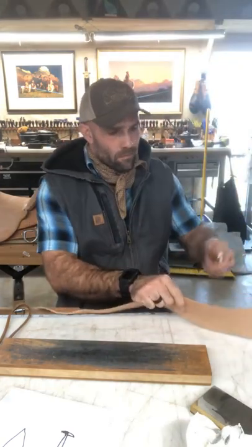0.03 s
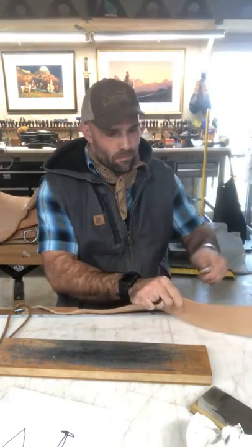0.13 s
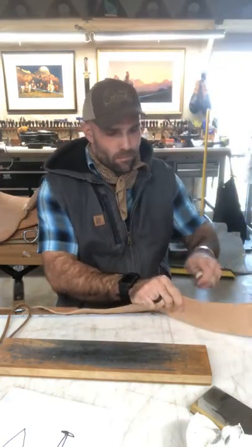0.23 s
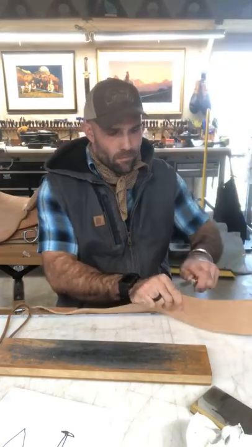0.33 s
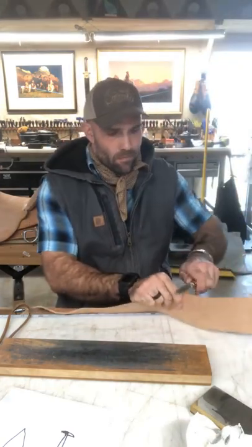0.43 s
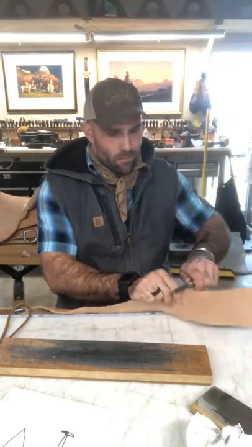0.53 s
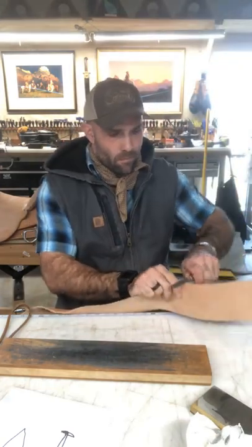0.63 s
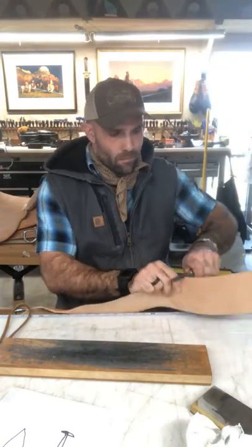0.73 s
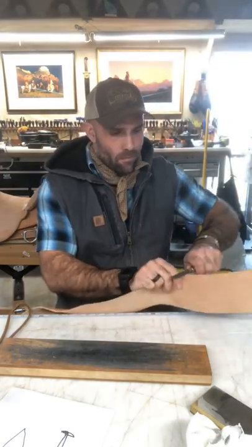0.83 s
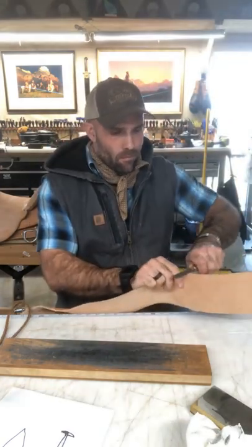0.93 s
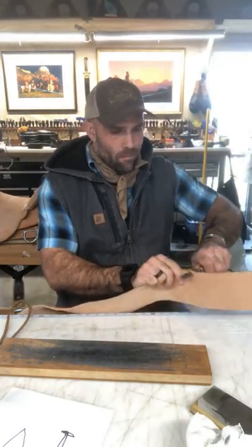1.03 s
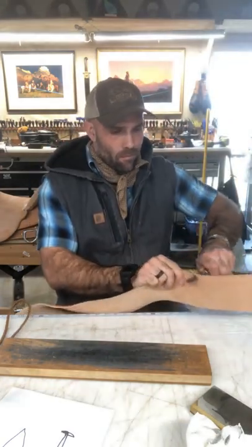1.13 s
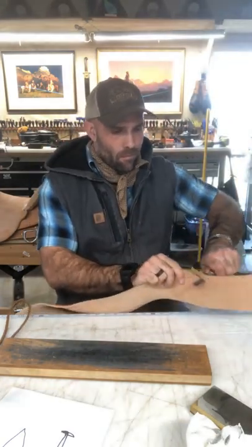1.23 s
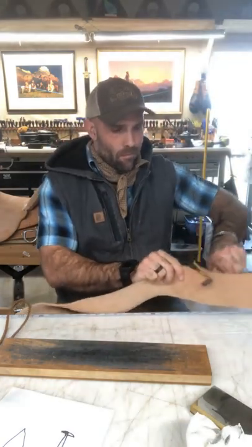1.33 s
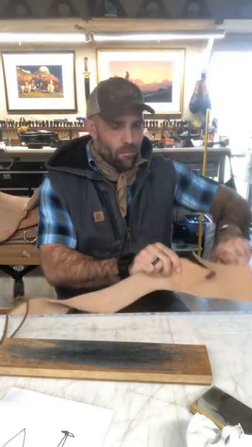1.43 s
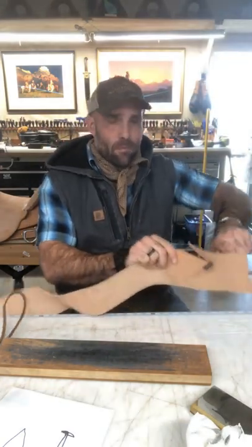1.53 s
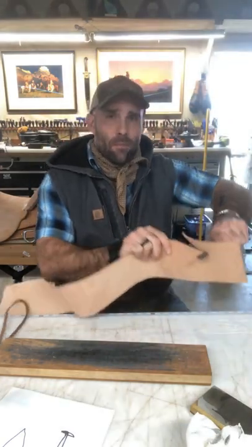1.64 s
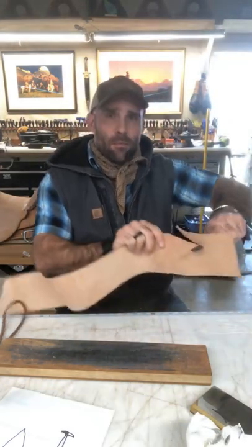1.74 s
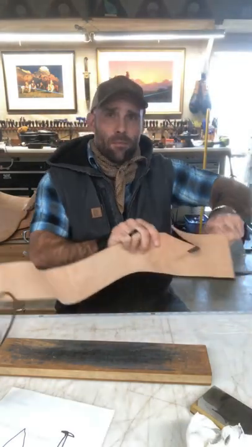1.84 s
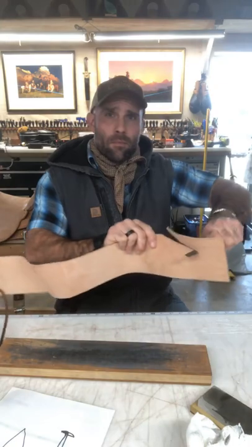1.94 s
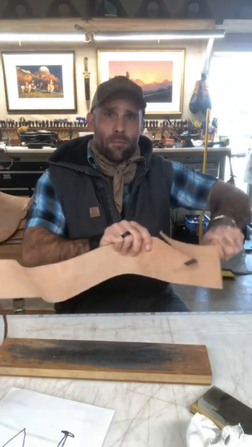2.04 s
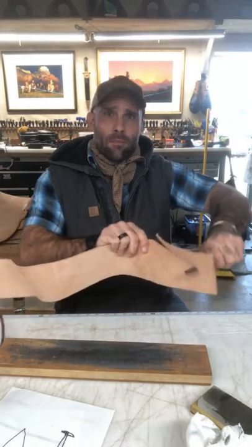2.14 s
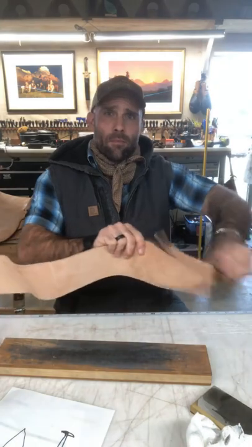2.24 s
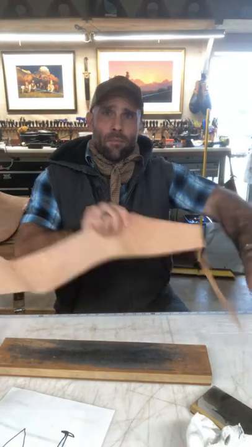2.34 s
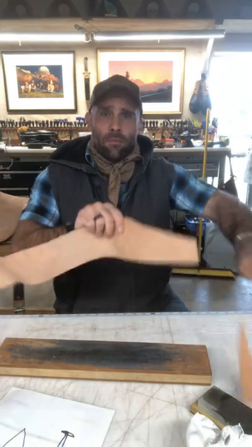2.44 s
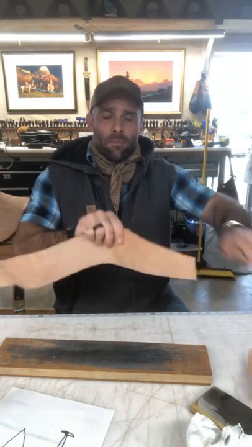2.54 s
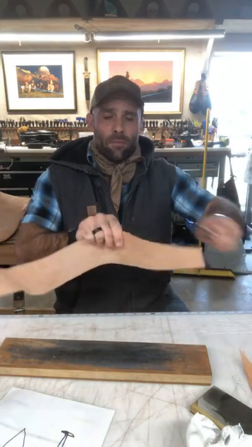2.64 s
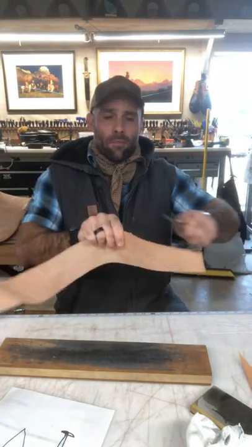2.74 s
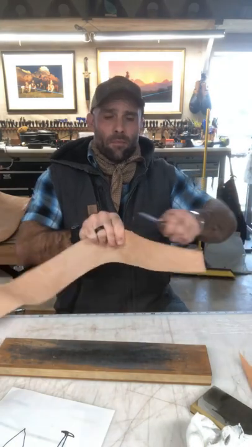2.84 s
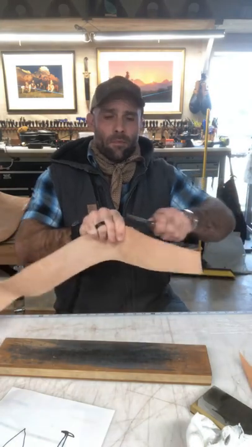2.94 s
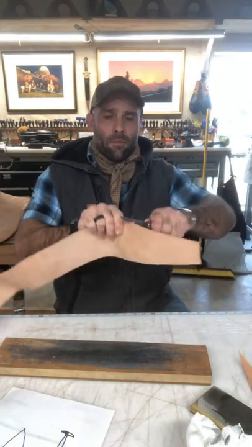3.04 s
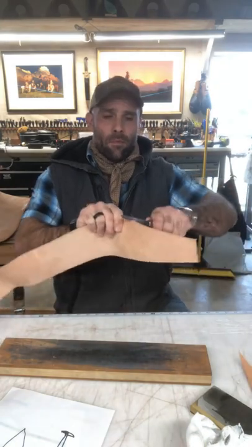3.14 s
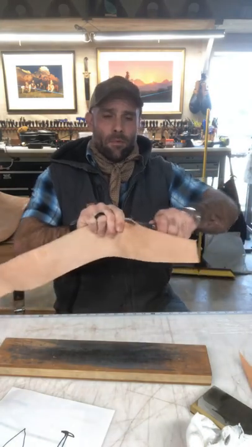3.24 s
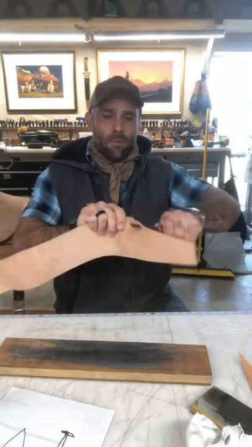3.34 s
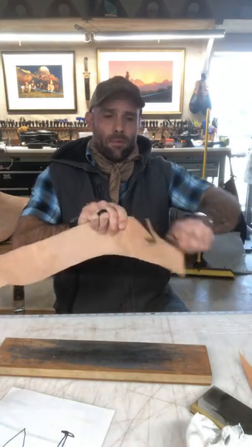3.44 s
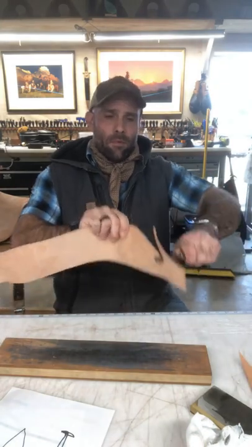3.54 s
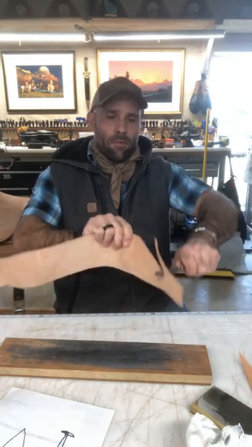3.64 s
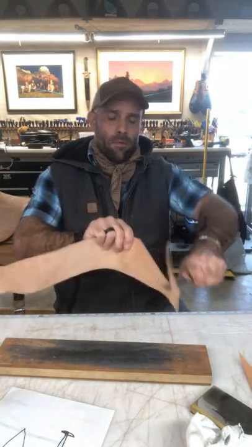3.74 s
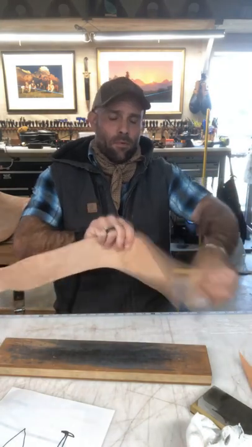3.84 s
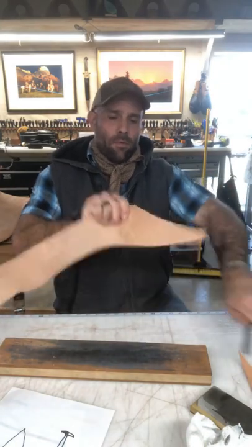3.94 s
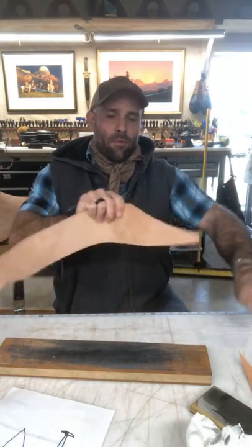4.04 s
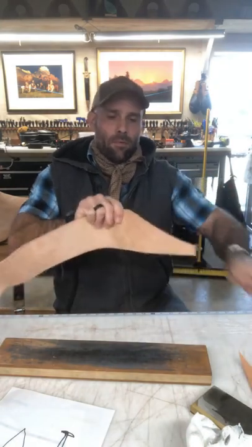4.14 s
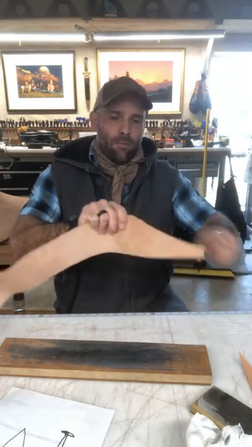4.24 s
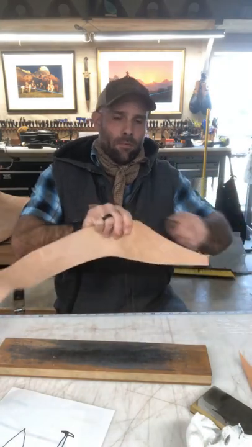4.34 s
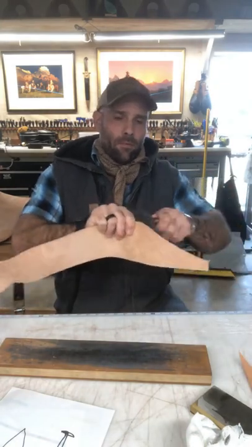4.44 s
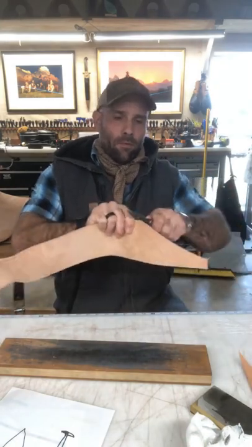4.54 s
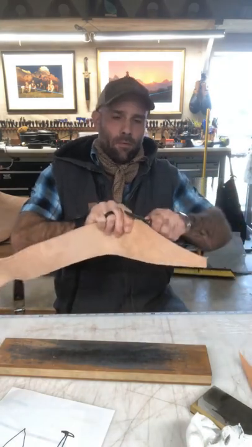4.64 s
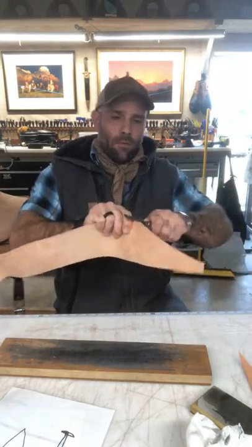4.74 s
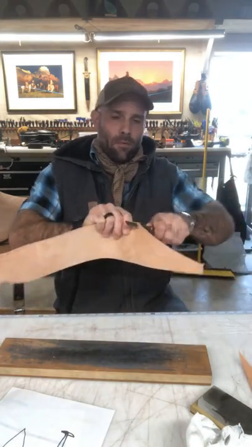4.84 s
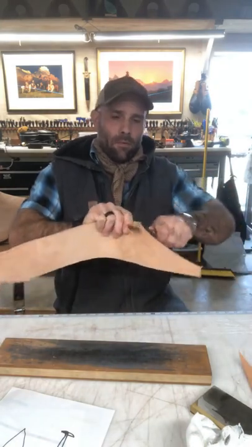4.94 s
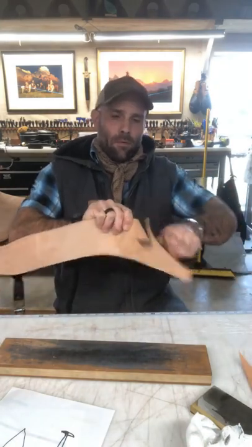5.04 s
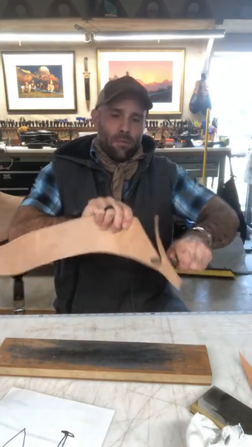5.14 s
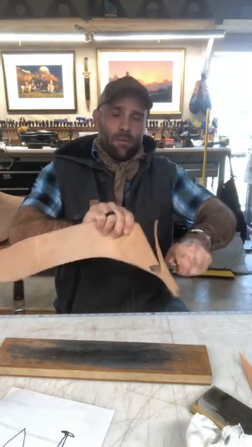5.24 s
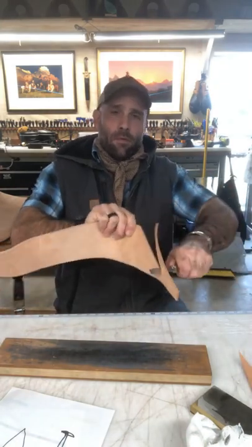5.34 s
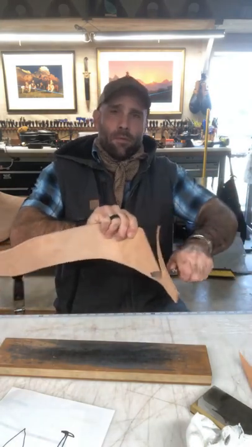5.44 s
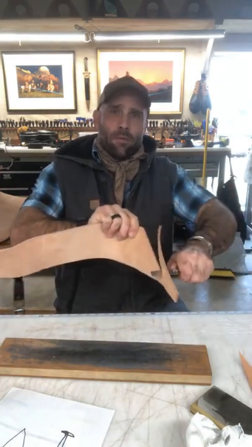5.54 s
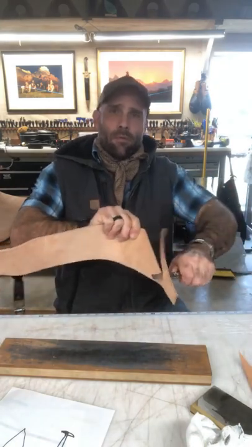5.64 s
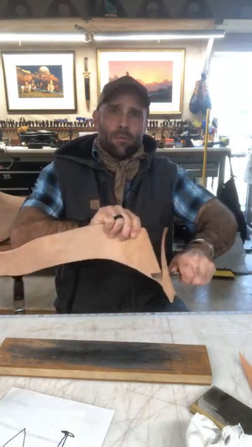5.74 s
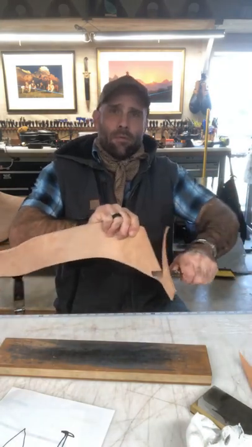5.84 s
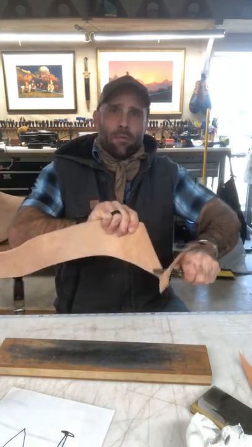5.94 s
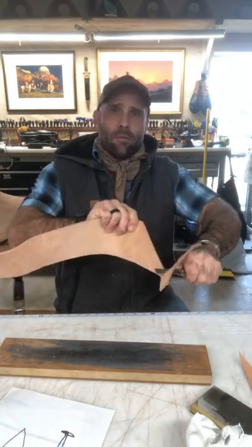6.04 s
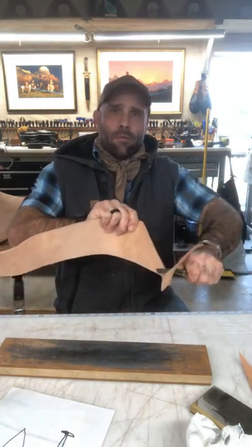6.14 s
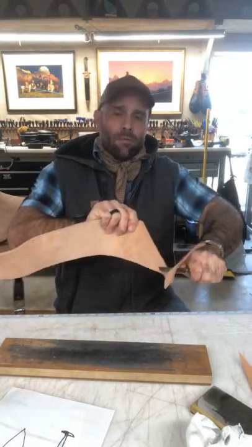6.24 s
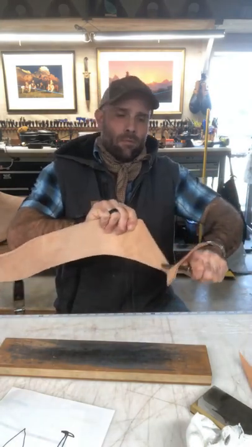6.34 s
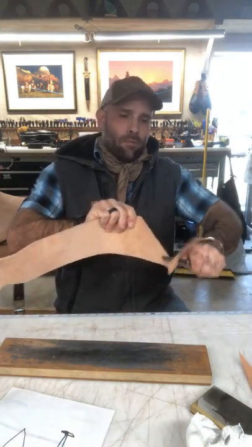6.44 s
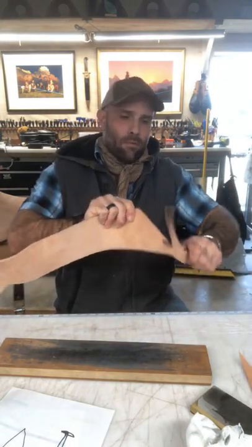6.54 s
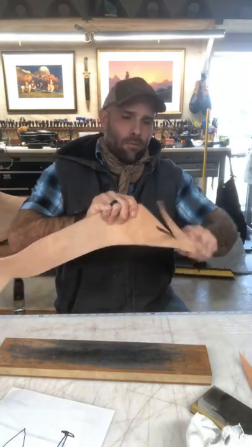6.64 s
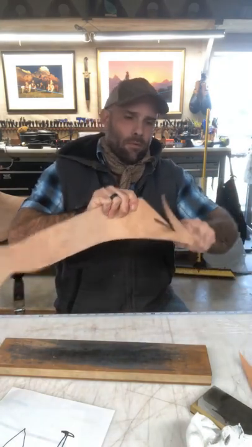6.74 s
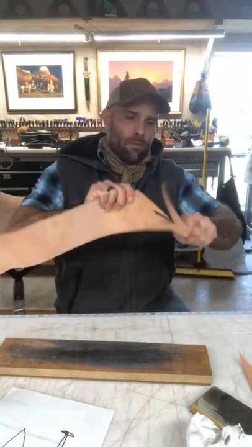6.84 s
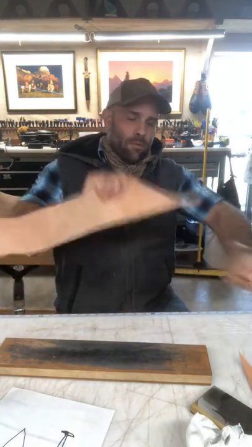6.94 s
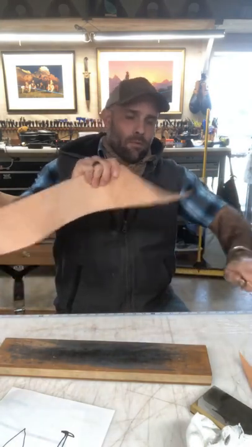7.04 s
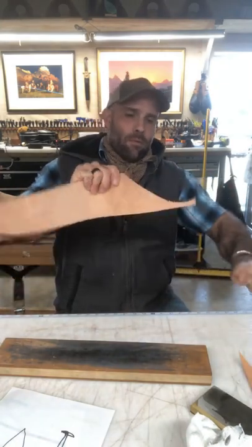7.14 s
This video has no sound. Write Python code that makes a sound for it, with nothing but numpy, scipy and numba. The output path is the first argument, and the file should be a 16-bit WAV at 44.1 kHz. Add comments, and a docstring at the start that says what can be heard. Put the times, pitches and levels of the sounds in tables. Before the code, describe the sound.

Over the low hum of ventilation in a small workshop, a sheet of leather flexes softly and a nearby knife draws a long, hissing cut through it. A sharp click and dull flaps lead into several shorter, rasping slices. Then the blade catches, tearing forward in crackling jerks with a faint steel ring. One quick pull snaps the last fibres, and the sheet flaps once more.

```python
"""A knife trims strips off stiff leather above a workshop bench, over a low ventilation hum.
One long stroke parts the fibres in a dense rasp; then the knife clicks and the loose sheet flaps.
Quicker slices follow from 3 s, with more flaps between them. Past 5 s the blade sticks in a tough
spot and jerks forward in sharp cracks. Near 7 s a short pull rips the last fibres, the strip whips
free, and a last dull flap thuds in the small room."""
import sys
import numpy as np
from scipy import signal
from scipy.fft import rfft, irfft
from scipy.io import wavfile
from scipy.ndimage import uniform_filter1d, map_coordinates
from numba import njit

SR = 44100
rng = np.random.default_rng(int(sys.argv[2]) if len(sys.argv) > 2 else 0)


def to_wav(sig):
    """Store sig (one row per channel, or 1-D mono) as 16-bit WAV at the path in sys.argv[1].

    Samples outside -1..1 are clipped; the rate is SR.
    """
    pcm = np.clip(np.atleast_2d(sig), -1, 1) * 32767
    pcm = np.round(pcm).astype(np.int16)
    wavfile.write(sys.argv[1], SR, pcm.T)  # frames by channels


N = 317501

# bright hiss of parting fibres: (frequency [Hz], level [dB])
FIBRE_SPECTRUM = [(900, -38), (2200, -8), (3000, 0), (3500, 2), (5400, 0.5), (7200, -1.5), (9200, -3.5),
                  (10500, -4.5)]
# full-bodied crack of tearing leather: (frequency [Hz], level [dB])
TEAR_SPECTRUM = [(90, -9.5), (200, -1), (310, 10), (460, -5), (580, 3.5), (790, -4.5), (1100, 0), (1500, 2),
                 (1800, -13), (2400, -3), (3200, -8.5), (5000, -13), (9300, -15), (11000, -11)]


def strokes():
    """Snapping fibres shake the sheet, hiss, and excite a ring that glides as the cut nears the edge."""
    # how hard the blade cuts, one curve a stroke: (time [s], effort [dB])
    long_slice = [(0.995, -45.5), (1.005, -47.5), (1.017, -40), (1.203, -52), (1.215, -45.5),
                  (1.397, -43.5), (1.745, -59.5), (1.781, -49.5), (1.931, -54.5), (2.167, -44),
                  (2.199, -45.5), (2.323, -30.5), (2.335, -42)]
    quick_slices = [
        [(3.15, -56.5), (3.176, -47.5), (3.224, -69), (3.23, -41), (3.274, -37.5), (3.328, -41), (3.43, -31.5),
         (3.528, -35), (3.55, -52)],
        [(3.705, -39), (3.721, -40), (3.745, -31), (3.883, -32), (3.89, -42)],
        [(4.8, -40), (4.808, -37), (4.902, -50), (4.99, -38.5), (5.054, -38), (5.066, -36), (5.168, -29),
         (5.2, -36.5), (5.21, -52)],
    ]
    short_pulls = [
        [(3.595, -37.5), (3.605, -36.5), (3.619, -42), (3.63, -47)],
        [(6.85, -54), (6.892, -44), (6.93, -23), (6.936, -21.5)],
    ]
    # the ring of each stroke above: (time at the edge [s], run-out [s], pitch [Hz],
    # pitch at the edge [Hz], ring-to-sheet balance [dB], balance at the edge [dB])
    stroke_rings = [(2.235, .012, 1540, 1830, -0.5, 1.5), (3.475, 0.03, 1730, 2480, 11.5, -2.5),
                    (3.8, 0.017, 1630, 1610, -3, 3.5), (5.121, 0.0091, 1680, 2370, 11, 5),
                    (3.61, .01, 1800, 1890, 3, -12), (6.91, .015, 1400, 1270, 2.5, 6.5)]
    # body of the shaken sheet: (frequency [Hz], level [dB])
    sheet_spectrum = [(100, -13), (190, -1), (290, 5), (450, 1), (600, 5.5), (790, -2.5), (1000, 2),
                      (1200, -9.5), (1600, -19.5), (2600, -24), (5000, -70)]
    out = np.zeros(N)
    for curve, stroke_ring in zip([long_slice, *quick_slices, *short_pulls], stroke_rings):
        edge_s, run_out_s, hz, edge_hz, over_db, edge_db = stroke_ring
        times, efforts = np.transpose(curve)
        t = np.arange(times[0] - .01, times[-1] + .02, 1 / SR)
        effort_db = np.interp(t, times, efforts)
        at_edge = (1 + np.tanh((t - edge_s) / (2 * run_out_s))) / 2
        pitch = hz + (edge_hz - hz) * at_edge
        # the effort is shared between the whole sheet and the ring at the cut
        balance_db = over_db + (edge_db - over_db) * at_edge
        sheet_db = effort_db - 10 * np.log10(1 + amp(balance_db) ** 2)
        # fibres lie in bundles, so the rasp comes in clumps
        fibres = snaps(len(t), rate=9000, spread_db=-2.0)
        fibres *= amp(1.37 * wobble(170, len(t)) + 1.6 * wobble(32.7, len(t)))
        sheet = amp(sheet_db - 1.6) * unit_rms(coloured(fibres, sheet_spectrum))
        # a light stroke sings narrowly; a hard one shakes the sheet and smears the ring
        force = np.clip((sheet_db + 55) / 15, 0, 1)
        broad = unit_rms(ring(ring(fibres, pitch, width_hz=1010), pitch, width_hz=1130))
        narrow = unit_rms(ring(broad, pitch, width_hz=490))
        cut = amp(sheet_db + balance_db - 2.5) * (force * broad + (1 - force) * narrow)
        # the hiss grows a little faster than the effort
        hiss_db = effort_db - 6.5 + 0.17 * (effort_db + 39.5) - 0.1 * balance_db
        hiss = amp(hiss_db) * unit_rms(patchy(coloured(fibres, FIBRE_SPECTRUM), depth_db=1.8))
        add(out, t[0], (sheet + cut + hiss) * gate(t, times[0], times[-1], ramp_s=0.0055))
    return out


def bites():
    """The tip of the blade rasps brightly as it enters the leather."""
    # entries of the tip: (time [s], level [dB], t60 [s])
    entries = [(1.007, -47.5, 1), (3.155, -49, 0.21), (3.595, -39.5, 0.17), (3.704, -41, 0.26),
               (4.805, -64, 0.084)]
    out, t = np.zeros(N), np.arange(SR // 3) / SR
    for start, db, t60 in entries:
        fibres = snaps(len(t), rate=13000, spread_db=-2.0)
        tip = unit_rms(ring(ring(fibres, 2980, width_hz=760), 2440, width_hz=990))
        rasp = tip + amp(2.0) * coloured(fibres, TEAR_SPECTRUM)
        attack = 1 - np.exp(-t / 0.0052)
        add(out, start, amp(db - 4) * rasp * fade(t, t60) * attack)
    return out


def jerks():
    """Each slip of the stuck blade tears a bundle and rings both the taut leather and the steel."""
    # slips of the blade, the last row a brief soft scrape: (time [s], crack level [dB], ring level [dB])
    slips = [(2.318, -36.5, -35), (3.878, -31.5, -59), (5.262, -46, -36), (5.42, -49, -46),
             (5.46, -34, -53), (5.484, -29.5, -36.5), (5.653, -57, -49), (5.662, -35.5, -48),
             (5.684, -30.5, -43), (5.707, -32, -32), (5.714, -26.5, -26.5), (5.722, -37, -49),
             (5.875, -37.5, -37), (5.9209, -27, -30), (5.931, -27, -31), (5.9483, -27.5, -19),
             (6.048, -42.5, -41.5)]
    usual_tear_s, usual_crack_db = 0.0059, -34.5
    out, t = np.zeros(N), np.arange(SR // 6) / SR
    for start, crack_db, ring_db in slips:
        tear = burst(t, usual_tear_s * amp(-0.29 * (crack_db - usual_crack_db)))  # harder is quicker
        crack = amp(1.5) * coloured(tear, TEAR_SPECTRUM) + amp(-15.5) * steel(t)
        cut = pluck(tear, hz=1405 + 20 * rng.normal(), width_hz=185)
        jerk = amp(crack_db) * crack + amp(ring_db - 4.5) * cut
        add(out, start, dispersed(jerk, travel_s=0.001575))
    return out


def rips():
    """The last bundles tear in quick succession, then the strip whips free with a snap."""
    # last bundles: (time [s], tearing time [s], level [dB], ring pitch [Hz])
    bundles = [(6.9387, 0.0082, -21, 1480), (6.9476, 0.0046, -14.5, 1260), (6.954, 0.006, -18.5, 1075)]
    out, t = np.zeros(N), np.arange(SR // 10) / SR
    for start, tear_s, db, hz in bundles:
        tear = burst(t, tear_s)
        tone = pluck(ring(tear, hz, width_hz=1500), hz, width_hz=155)
        cut = unit_energy(tone) * np.linalg.norm(tear)
        add(out, start, amp(db) * (cut + amp(-6) * coloured(tear, FIBRE_SPECTRUM)))
    add(out, 6.9555, amp(-8.5) * bend(top_hz=1580, low_hz=530, travel_s=0.0031))
    return out


def flaps():
    """Bending waves cross the loose sheet and scatter back from its edges as a dull thud."""
    # flexes of the sheet: (time [s], level [dB], brightness limit [Hz])
    flexes = [(.021, -40, 880), (.121, -38.5, 403), (.565, -45.5, 303), (2.52, -32.5, 850),
              (2.571, -34, 198), (2.608, -39, 1024), (2.766, -32.5, 860), (2.933, -35, 209),
              (3.086, -41.5, 1284), (4.122, -30, 740), (4.182, -39, 1393), (4.306, -43, 880),
              (6.191, -46.5, 1490), (6.355, -49.5, 1500), (7.121, -32.5, 290)]
    small_flex_hz = 1355  # brighter flexes are small and travel less
    dull = signal.butter(1, 700, fs=SR)
    out, t = np.zeros(N), np.arange(SR // 8) / SR
    for start, db, top_hz in flexes:
        wave = bend(top_hz, low_hz=108, travel_s=0.00472 / (1 + (top_hz / small_flex_hz) ** 6))
        echoes = unit_energy(rng.standard_normal(len(t)) * fade(t, t60=0.098))
        scatter = signal.lfilter(*dull, signal.fftconvolve(wave, echoes)[:len(wave)])
        add(out, start, amp(db - 3) * (wave + amp(-1.5) * scatter))
    return out


def knife():
    """The knife clicks dryly, and light plucks of its edge set the steel ringing."""
    # dry clicks: (time [s], level [dB])
    clicks = [(2.524, -35), (2.569, -18.5), (2.918, -61), (2.930, -61), (4.127, -39), (4.142, -43),
              (5.395, -49)]
    # plucks of the edge: (time [s], level [dB])
    tinks = [(0.6794, -59.5), (6.3876, -60)]
    # colour of a hard contact: (frequency [Hz], level [dB])
    click_spectrum = [(200, -23), (700, -4.5), (1500, -3), (3200, -4), (6000, -5.5), (9000, -10.5),
                      (11000, -21)]
    out, t = np.zeros(N), np.arange(SR // 5) / SR
    for start, db in clicks:
        contact = unit_energy(burst(t, length_s=.0018))
        add(out, start, amp(db + 11.5) * coloured(contact, click_spectrum))
    for start, db in tinks:
        scratch = amp(-8) * coloured(rng.standard_normal(len(t)) * fade(t, t60=.18), click_spectrum)
        add(out, start, amp(db + 6.5) * (steel(t) + scratch))
    return out


def steel(t):
    """The blade rings, its modes a little differently balanced each time."""
    # steel modes: (frequency [Hz], level [dB], t60 [s])
    modes = [(2740, -10, 0.056), (6320, -2, 0.066), (6550, -11, 0.059), (8000, -11, 0.11)]
    return sum(amp(db + rng.normal(0, 1.8)) * fade(t, t60) * np.sin(2 * np.pi * hz * t)
               for hz, db, t60 in modes)


def slides():
    """Leather rubs softly against skin, swelling or fading steadily."""
    # slides through the hand: (time [s], length [s], level [dB], level change [dB])
    moves = [(0.0, 0.11, -62.5, -10), (0.946, .05, -69.5, -1), (2.919, 0.017, -59, -1),
             (4.061, 0.053, -72.5, 6), (4.126, 0.14, -65, -7.5), (6.52, 0.29, -75, 7)]
    out = np.zeros(N)
    for start, length, db, change_db in moves:
        t = np.arange(0, length, 1 / SR)
        grain = snaps(len(t), rate=4300, spread_db=4.0)
        rub = amp(-9.0) * coloured(grain, FIBRE_SPECTRUM) + amp(8.5) * coloured(grain, TEAR_SPECTRUM)
        add(out, start, amp(db + change_db * t / length) * rub)
    return out


def boom(x):
    """Thuds wake the lowest modes of the room."""
    # room modes: (frequency [Hz], width [Hz], level [dB])
    modes = [(90, 11, -7), (136.6, 3.3, -7.5)]
    return x + sum(amp(db) * pluck(x, hz, width_hz) for hz, width_hz, db in modes)


def room(x, wet_db):
    """The workshop answers with a short diffuse tail that differs as the hands move."""
    # reverb decay: (frequency [Hz], t60 [s])
    decay_times = [(100, 1), (300, 0.29), (1000, 0.3), (3000, 0.35), (9000, 0.34)]
    out, hop, predelay_s = np.zeros(N), SR // 4, 0.0058
    for first in range(0, N, hop):
        hz, t, noise = signal.stft(rng.standard_normal(SR // 2), SR, nperseg=256)
        tail = signal.istft(noise * fade(t, along(decay_times, hz)[:, None]), SR, nperseg=256)[1]
        add(out, first / SR + predelay_s, signal.fftconvolve(x[first:first + hop], unit_energy(tail)))
    return x + amp(wet_db) * out


def background():
    """Air noise and unsteady low tones, mostly of ventilation."""
    # room air: (frequency [Hz], level [dB])
    air_spectrum = [(13, -45.5), (22, -14), (60, -2), (90, -18.5), (150, -26), (184, -20), (209, -26.5),
                    (397, -34), (429, -33.5), (475, -39), (1850, -43.5), (2210, -45), (2380, -46.5),
                    (7940, -51), (10000, -56), (13000, -100), (22000, -120)]
    # low tones, among them a faint one at 138 Hz: (frequency [Hz], level [dB])
    tones = [(46, -59), (66, -68.5), (89, -63), (138, -67.5), (182, -80.5)]
    t = np.arange(N) / SR
    air = coloured(rng.standard_normal(N), air_spectrum, size=16384)
    hum = sum(amp(db) * np.sqrt(2) * np.sin(2 * np.pi * hz * t + 0.59 * wobble(28.0, N))
              for hz, db in tones)
    low_cut = signal.butter(3, 34, "high", fs=SR, output="sos")
    return amp(-51.0) * signal.sosfilt(low_cut, air) + hum


def snaps(n, rate, spread_db):
    """Fibres part at random, rate times a second, with uneven strength; rms 1."""
    parts = rng.random(n) < rate / SR
    polarity, strength = rng.standard_normal((2, n))
    return unit_rms(parts * np.sign(polarity) * amp(spread_db * strength))


def burst(t, length_s):
    """A bundle of fibres gives way; rms about 1 while it tears."""
    crackle = snaps(len(t), rate=12000, spread_db=1.0) * gate(t, 0.00027, length_s, ramp_s=0.002)
    return unit_energy(crackle) * np.sqrt(length_s * SR)


def bend(top_hz, low_hz, travel_s, size=8192):
    """The wave from one sudden flex of the sheet, peak 1."""
    hz = np.fft.rfftfreq(size, 1 / SR)[1:]
    low_pass = 1 / (1 + 1j * np.sqrt(2) * hz / top_hz - (hz / top_hz) ** 2) / (1 + .5j * hz / top_hz)
    high_pass = 1 / (1 + low_hz / (1j * hz)) ** 2
    wave = dispersed(irfft(np.r_[0, hz ** -.5 * low_pass * high_pass]), travel_s)
    return wave / np.abs(wave).max()


def dispersed(x, travel_s):
    """Bending waves cross leather high frequencies first; travel_s is the time taken at 1 kHz."""
    hz = np.fft.rfftfreq(len(x), 1 / SR)
    return irfft(rfft(x) * np.exp(-4j * np.pi * travel_s * np.sqrt(1000 * hz)), len(x))


def patchy(x, depth_db, size=512):
    """The colour shifts as the blade meets new leather."""
    frames = signal.stft(x, nperseg=size)[2]
    patches = uniform_filter1d(rng.standard_normal(frames.shape), size=5, axis=0)
    patches = uniform_filter1d(patches, size=30, axis=1)
    return signal.istft(frames * amp(depth_db * unit_rms(patches)), nperseg=size)[1][:len(x)]


def pluck(x, hz, width_hz):
    """The ring that x leaves in a resonance, with the energy of x."""
    return unit_energy(ring(x, hz, width_hz)) * np.linalg.norm(x)


def ring(x, hz, width_hz):
    """x through a resonance at a steady or gliding pitch."""
    return resonate(x, 2 * np.pi * hz / SR * np.ones(len(x)), np.exp(-np.pi * width_hz / SR))


@njit
def resonate(x, turn, radius):
    """A two-pole band-pass whose pitch, turn [radians a sample], may move."""
    y = np.zeros(len(x))
    for i in range(2, len(x)):
        y[i] = x[i] - x[i - 2] + 2 * radius * np.cos(turn[i]) * y[i - 1] - radius * radius * y[i - 2]
    return y


def coloured(x, spectrum, size=2048):
    """x through a causal filter of unit energy with the given spectrum."""
    gain = amp(along(spectrum, np.fft.rfftfreq(size, 1 / SR)))
    cepstrum = irfft(np.log(gain))
    cepstrum[1:size // 2] *= 2  # minimum phase keeps attacks sharp
    cepstrum[size // 2 + 1:] = 0
    kernel = irfft(np.exp(rfft(cepstrum)))
    return signal.fftconvolve(x, unit_energy(kernel))[:len(x)]


def along(points, hz):
    """Interpolate (frequency [Hz], value) points on a log axis."""
    knots_hz, values = np.transpose(points)
    return np.interp(np.log(hz + 1), np.log(knots_hz), values)


def gate(t, start, end, ramp_s):
    """Full contact from start to end, with a ramp on either side."""
    return np.clip((t - start) / ramp_s + 1, 0, 1) * np.clip((end - t) / ramp_s + 1, 0, 1)


def fade(t, t60):
    """A decay that loses 60 dB in t60."""
    return np.exp(-np.log(1000) * t / t60)


def wobble(rate, n):
    """A smooth random curve, rate knots a second."""
    return map_coordinates(rng.standard_normal(int(n * rate / SR) + 4), [np.arange(n) * rate / SR])


def add(track, start_s, sound):
    """Mix a sound in at start_s."""
    part = track[max(round(start_s * SR), 0):][:len(sound)]
    part += sound[:len(part)]


def amp(db):
    return 10 ** (np.asarray(db) / 20)


def unit_rms(x):
    return x / np.sqrt(np.mean(x ** 2) + 1e-20)


def unit_energy(x):
    return x / np.linalg.norm(x)


def scene():
    """Knife and leather an arm's length away in a small workshop."""
    slicing = room(strokes() + bites() + slides(), wet_db=-6.0)
    snapping = room(jerks(), wet_db=-7.0) + room(knife(), wet_db=-4.5) + room(rips(), wet_db=-7.5)
    flapping = room(boom(flaps()), wet_db=-4.0)
    return (slicing + snapping + flapping + background())[None]


def record(dry):
    """A steep high cut takes off the top of the treble."""
    hz, cutoff_hz = np.fft.rfftfreq(N, 1 / SR), 9650
    return irfft(rfft(dry) / np.sqrt(1 + (hz / cutoff_hz) ** 120), N)


dry = scene()
out = record(dry)
to_wav(out)
```